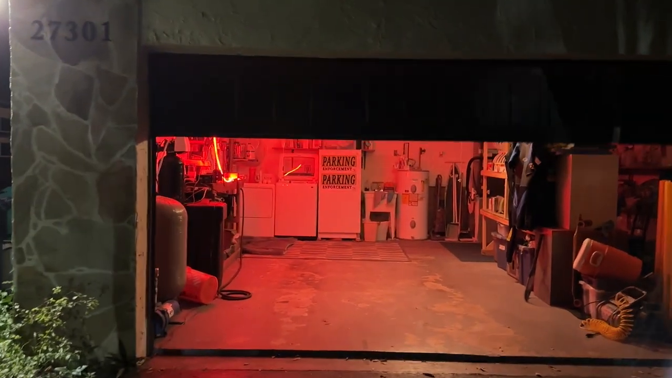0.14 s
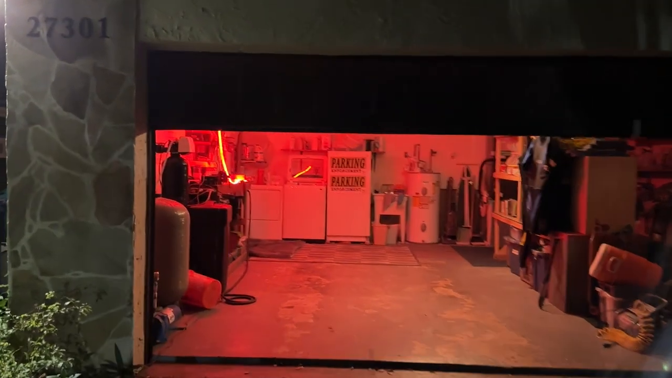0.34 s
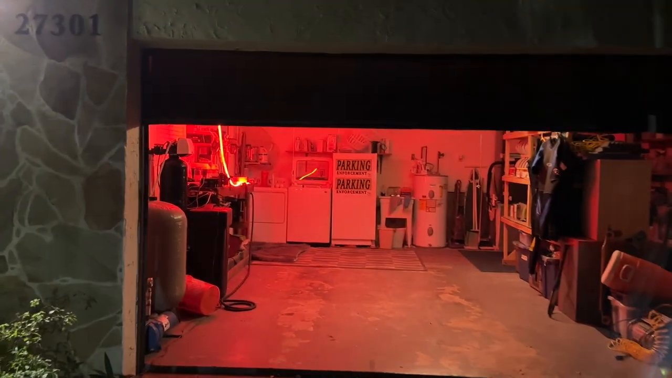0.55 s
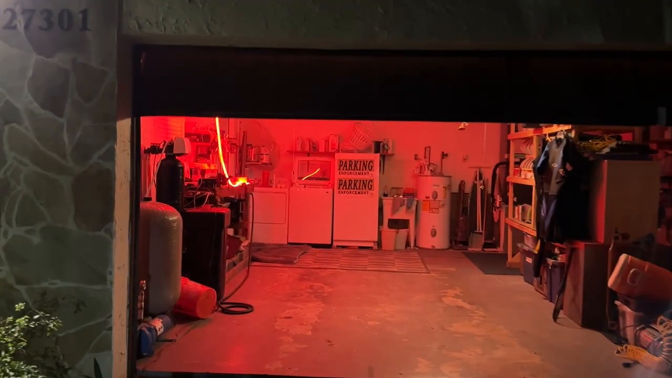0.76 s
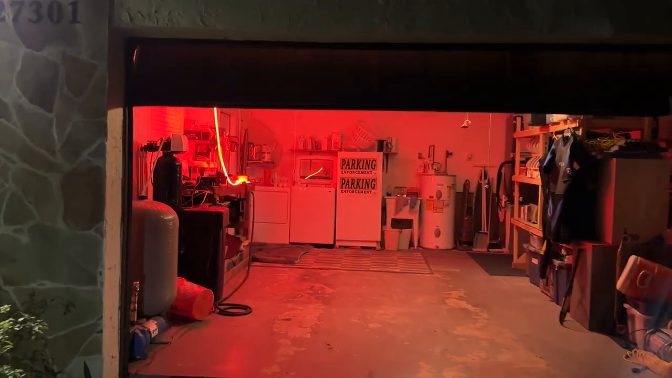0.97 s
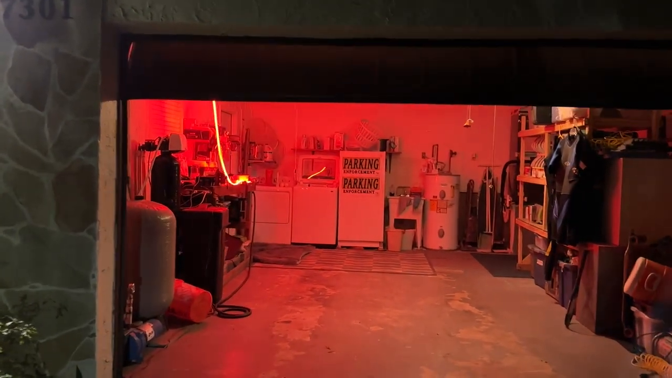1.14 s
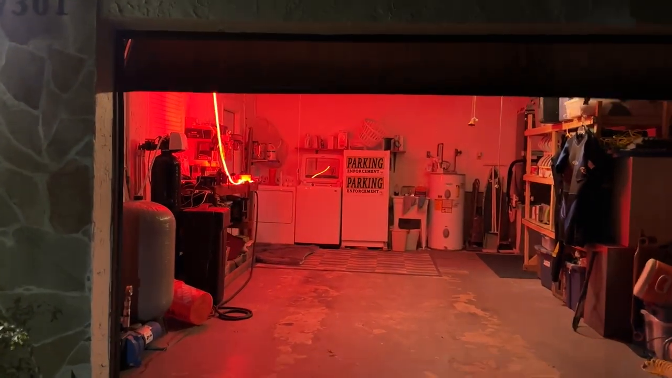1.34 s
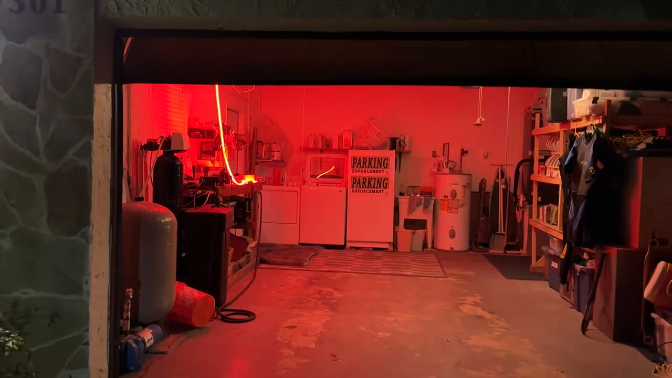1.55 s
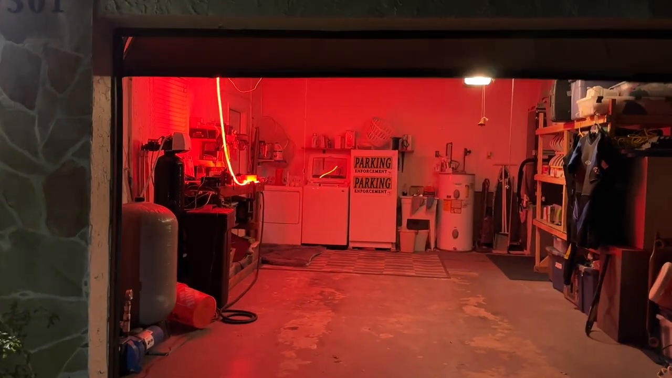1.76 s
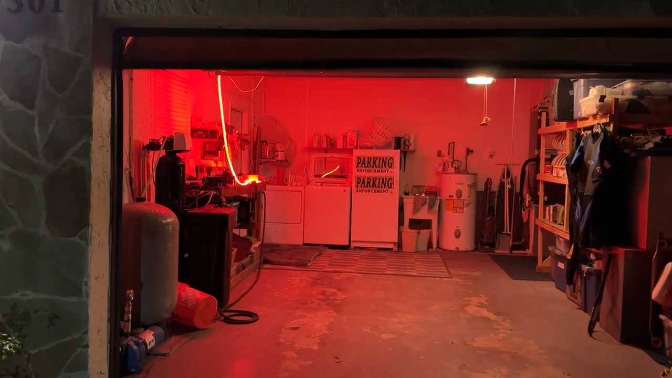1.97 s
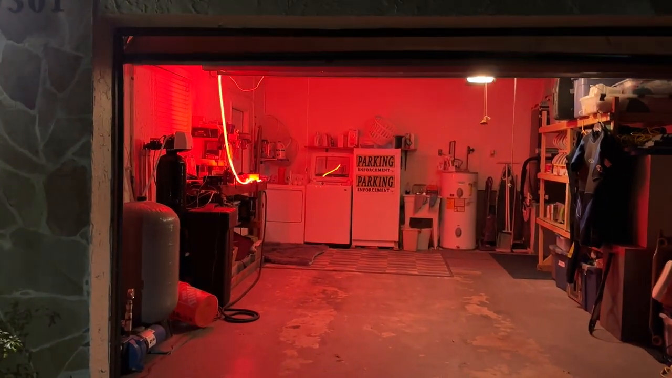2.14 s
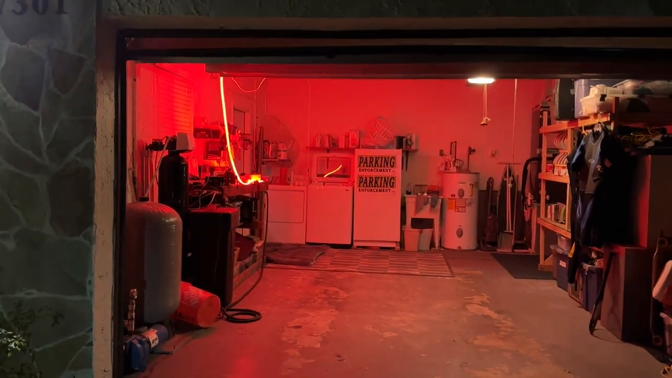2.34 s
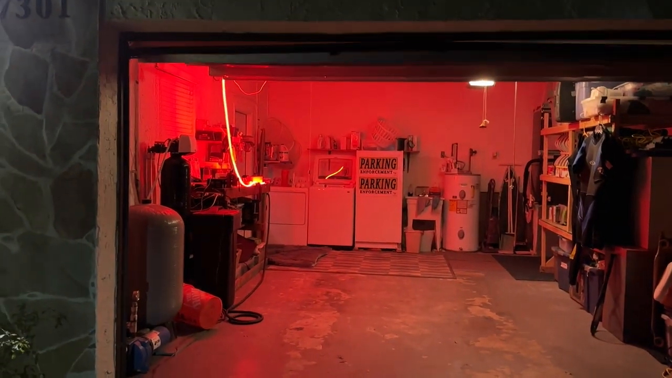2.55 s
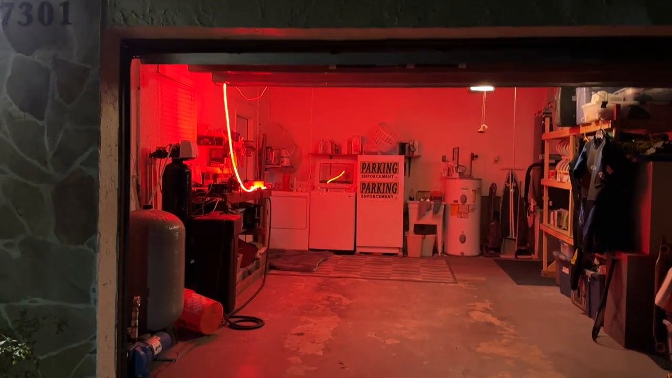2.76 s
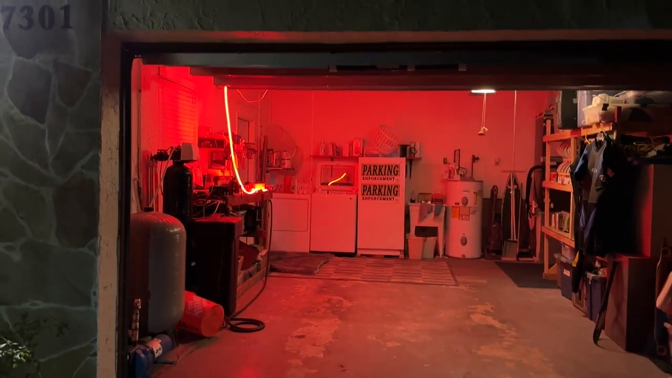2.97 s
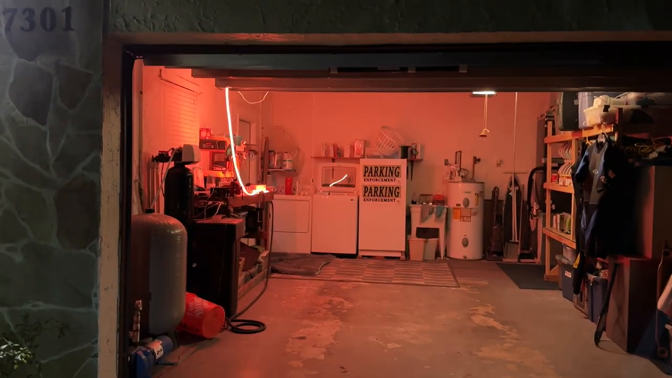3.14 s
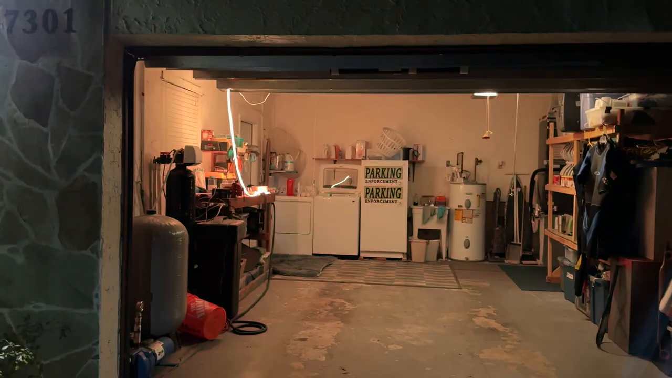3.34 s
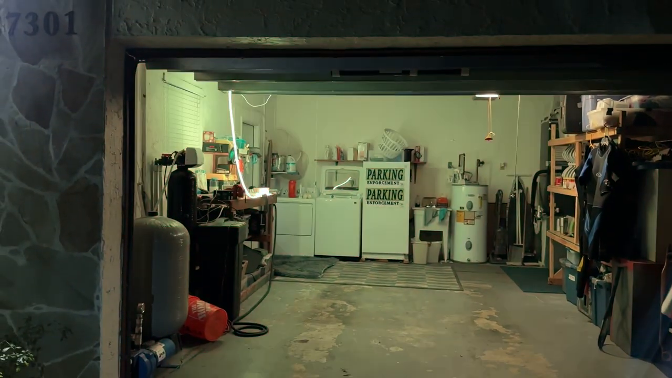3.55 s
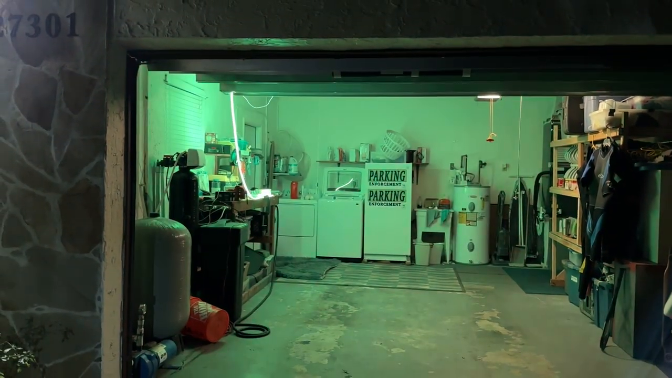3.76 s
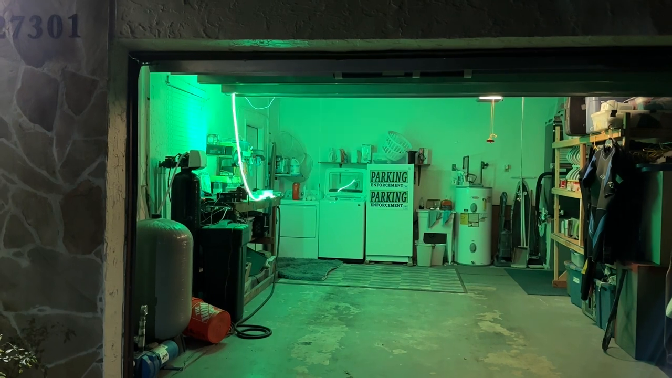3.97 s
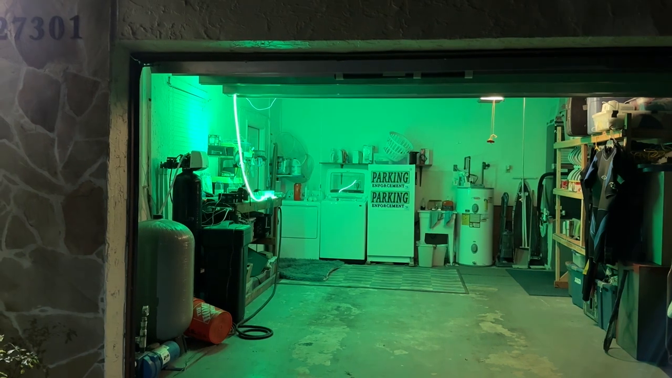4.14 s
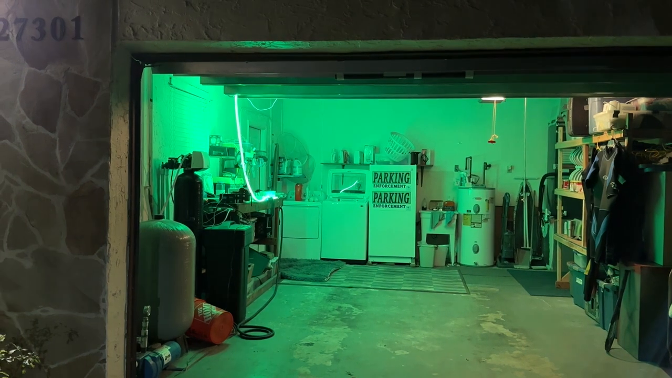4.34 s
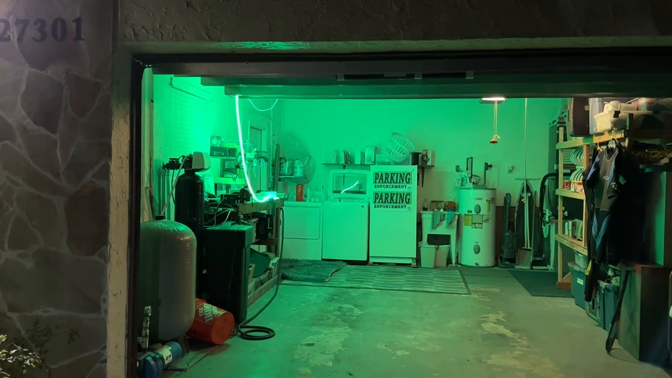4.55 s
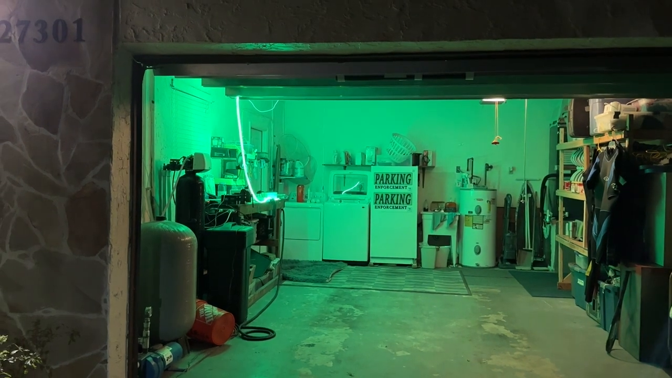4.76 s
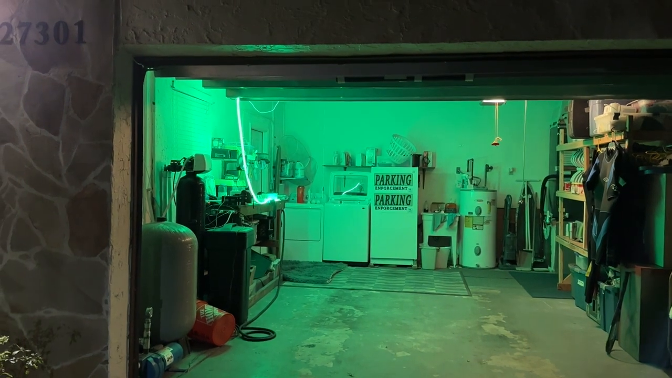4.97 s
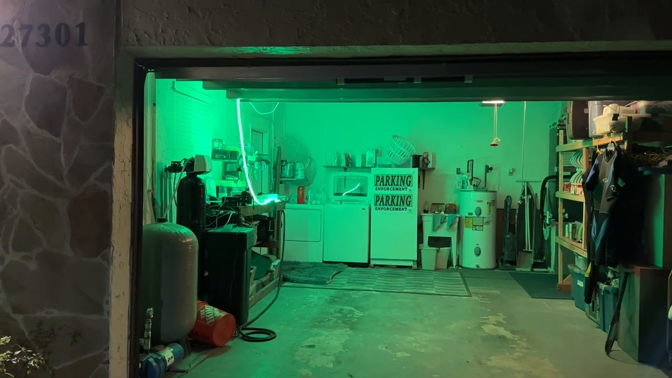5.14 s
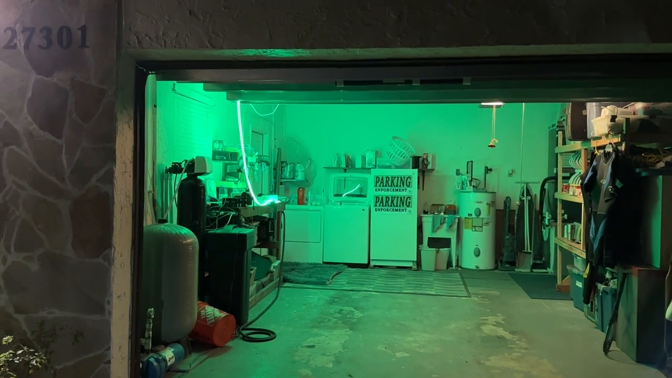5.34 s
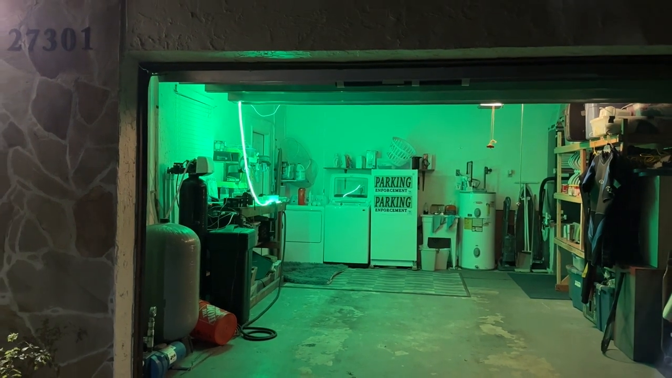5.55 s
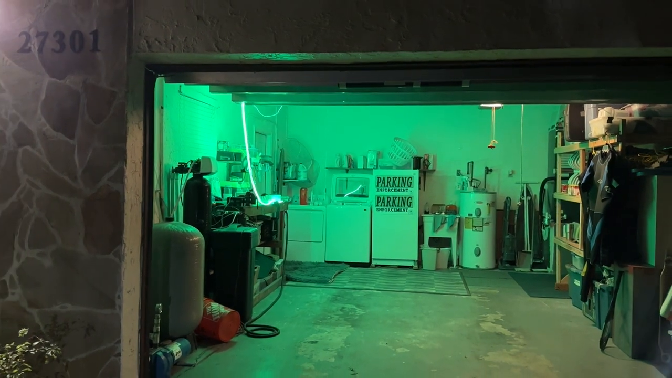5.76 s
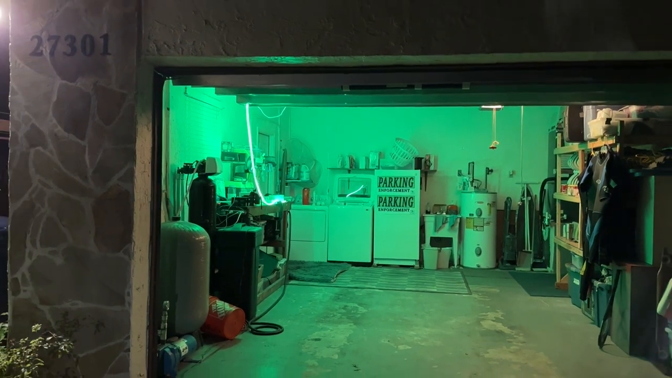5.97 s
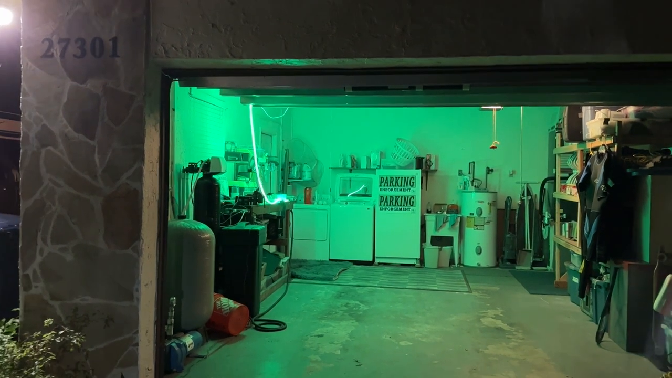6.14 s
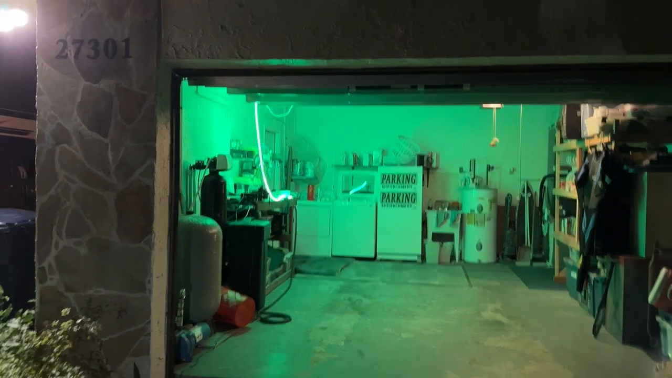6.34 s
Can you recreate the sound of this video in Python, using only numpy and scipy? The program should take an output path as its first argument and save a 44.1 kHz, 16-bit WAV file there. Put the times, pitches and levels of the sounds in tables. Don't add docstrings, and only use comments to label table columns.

```python
import sys
import numpy as np
from scipy import signal
from scipy.fft import rfft, irfft
from scipy.io import wavfile
from scipy.ndimage import uniform_filter1d

SR = 44100
rng = np.random.default_rng(int(sys.argv[2]) if len(sys.argv) > 2 else 0)


def invert_db(x):
    u = np.asarray(x, float) / 20
    return 10 ** u


def unload_audio(sound):
    columns = np.transpose(np.atleast_2d(sound))
    steps = np.round(np.clip(columns, -1, 1) * 32767)
    wavfile.write(sys.argv[1], SR, steps.astype(np.int16))


N = 282284
STOP_S = 3.181

SHAKE_RANGES_HZ = [250, 600, 1350, 3200]
# [start_s, peak_db, ring_hz, top_end_db, t60_s]
ROLLER_CLANKS = [(0.093, -35, 9400, -57, .25), (0.1184, -37, 9800, -62, 0.31),
                 (0.1577, -38, 8400, -57, 0.3), (0.343, -37.5, 10300, -51, 0.22),
                 (0.395, -36, 8800, -48, .12), (.408, -37, 7600, -46, .3), (0.423, -38, 9400, -47, 0.45),
                 (0.6611, -55, 6600, -56, .4), (0.736, -48, 8700, -56, .4), (1.0504, -42, 7000, -68, .4),
                 (1.3045, -25.5, 8600, -66, .13), (1.394, -46, 8800, -54, .2),
                 (1.4057, -36, 10700, -43, .3), (1.4299, -35, 10800, -56, .4),
                 (1.5411, -37.5, 7700, -53, 0.79), (1.65, -30.5, 8910, -42, 0.13),
                 (1.722, -46, 8150, -52, .2), (1.7425, -48, 8150, -52, .3), (1.808, -42, 7530, -57, .4),
                 (1.8417, -46, 7580, -60, .3), (1.9028, -39, 8280, -56, .3), (2.0294, -52, 9500, -54, .3),
                 (2.0673, -39, 6630, -54, 0.47), (2.2398, -44, 9000, -61, 0.37),
                 (2.3183, -39, 7290, -61, 0.41), (2.3476, -36, 8500, -61, 0.88),
                 (2.4337, -29.5, 6960, -46, .2), (2.499, -39, 8000, -56, 0.22),
                 (2.5586, -52, 9000, -60, 0.18), (2.6125, -34, 7800, -51, 0.22),
                 (2.6454, -41, 8440, -60, 0.27), (2.728, -42, 7820, -56, .2), (2.745, -39, 7820, -57, 0.45),
                 (2.868, -56, 8990, -59, .2), (2.884, -36, 7100, -52, 0.17),
                 (2.9574, -27.5, 7800, -39, .17), (3.002, -34, 8460, -46, 0.23),
                 (3.0592, -39, 9400, -64, .3), (3.0999, -40, 9600, -62, 0.18), (3.133, -34, 8250, -56, .25)]


def rms_one(x):
    return x / np.sqrt(np.mean(x ** 2) + 1e-20)


def in_time(rows):
    s, *columns = np.transpose(rows)
    return [np.interp(np.arange(N) / SR, s, c) for c in columns]


def at_hz(points, hz):
    return np.interp(np.log(hz), np.log(np.array(points)[:, 0]), np.array(points)[:, 1])


def drift(rate):
    r = np.exp(-80 * np.pi * rate / SR)
    slow = signal.lfilter([1], [1, -2 * r, r * r], rng.standard_normal(N // 40 + 2002))
    slow = slow[2000:]
    return np.interp(np.arange(N) / 40, np.arange(len(slow)), rms_one(slow))


def band(x, low_hz, high_hz, order=2):
    edges_hz = [low_hz, min(high_hz, .45 * SR)]
    return signal.sosfilt(signal.butter(order, edges_hz, "band", fs=SR, output="sos"), x)


def resonate(x, hz, width_hz):
    r = np.exp(-np.pi * width_hz / SR)
    poles = [1, -2 * r * np.cos(2 * np.pi * hz / SR), r * r]
    return signal.lfilter(np.array([1, 0, -1]) * (1 - r * r) / 2, poles, x)


def colour(x, spectrum):
    hz = np.maximum(np.fft.rfftfreq(N, 1 / SR), 1)
    return rms_one(irfft(rfft(x) * invert_db(at_hz(spectrum, hz)), N))


def tone(hz):
    return np.sqrt(2) * np.sin(2 * np.pi * np.cumsum(hz) / SR)


def grains(per_s, spread_db):
    sizes = invert_db(spread_db * np.minimum(rng.exponential(1, N), 5)) * rng.choice([-1, 1], N)
    return rms_one(sizes * (rng.random(N) < per_s / SR))


def add(out, s, x):
    i = round(s * SR)
    out[i:i + len(x)] += x[:N - i]


def decays(s, sizes, t60):
    steps = np.zeros(N)
    steps[(np.asarray(s) * SR).astype(int)] = sizes
    return signal.lfilter([1], [1, -invert_db(-60 / (t60 * SR))], steps + 1e-18)


def height():
    return np.clip(np.arange(N) / SR / STOP_S, 0, 1)


def after_stop(t60):
    return -60 * np.maximum(np.arange(N) / SR - STOP_S, 0) / t60


def burst(t60, rise_s):
    t = np.arange(SR // 4) / SR
    bounces = invert_db(2.0 * np.repeat(rng.standard_normal(len(t) // 300 + 1), 300)[:len(t)])
    bounces[:450] = invert_db(2.0)
    early = uniform_filter1d(bounces, size=80) * invert_db(-60 * t / t60)
    room = invert_db(-20.0 - 60 * t / 0.45)
    attack = 1 - np.exp(-t / rise_s)
    fade_out = np.minimum(1, 20 * (t[-1] - t))
    return rng.standard_normal(len(t)) * attack * (early + room) * fade_out


def many_modes(x):
    ripple_db, ripple_hz = 1.8, 40
    hz, spectrum = np.fft.rfftfreq(N, 1 / SR), rfft(x)
    ripples = ripple_db * rng.standard_normal((2, int(hz[-1] / ripple_hz) + 2))
    low, high = (irfft(spectrum * invert_db(np.interp(hz / ripple_hz, np.arange(len(r)), r)), N)
                 for r in ripples)
    blend = np.sin(2.5 * np.pi * height()) ** 2
    return blend * low + (1 - blend) * high


def night():
    # [pitch_hz, density_db_per_hz]
    wash_spectrum = [(18, -70), (38, -45), (60, -11), (90, 0), (192, 0), (277, -4.5), (467, -6.5),
                     (970, -5), (1590, -11.5), (2400, -25), (3500, -34), (4800, -36), (7650, -39.5),
                     (15500, -60)]
    # [start_s, level_db]
    wash_level = [(3.8, -55), (4.09, -56), (4.45, -57), (5.45, -59), (5.71, -58), (6.2, -59.5)]
    # [start_s, level_db]
    engine_level = [(3.8, -69), (4.23, -73.5), (4.36, -60.5), (4.95, -76), (5.08, -63.5), (5.36, -80),
                    (6.4, -74)]
    wash = colour(rng.standard_normal(N), wash_spectrum)
    wash = wash * invert_db(in_time(wash_level)[0] + 0.38 * drift(9.3))
    engine_db = in_time(engine_level)[0] + 2.0 + 2.0 * drift(13)
    return wash + invert_db(engine_db) * tone(197 + 4.1 * drift(5.92))


def singer(faster, unsteady, centre, wide, fade_db):
    # [start_s, strokes_per_s]
    wing_strokes = [(0, 165.75), (4.3, 165.7), (5.2, 165.45), (6.4, 165.3)]
    cycles = np.cumsum(faster * in_time(wing_strokes)[0] * (1 + unsteady * drift(2.5))) / SR
    out = 0
    for k in range(round(centre) - 3, round(centre) + 7):
        wing_db = -14 * np.log10(1 + ((k - centre) / wide) ** 4) + fade_db * drift(5.0)
        hushed_db = -40 * (k < 36 and faster == 1)
        out = out + invert_db(wing_db + hushed_db) * np.sin(2 * np.pi * (k * cycles + rng.random()))
    return rms_one(out)


def insects():
    # [start_s, level_db]
    chorus_level = [(0, -55.5), (.6, -53), (1.2, -54.5), (3.2, -52), (3.6, -61), (4.2, -61), (5, -61),
                    (5.7, -61), (6.4, -61.5)]
    # [pitch_hz, density_db_per_hz]
    far_spectrum = [(4000, -45), (5000, -27), (5250, -18), (5450, -14), (5700, -2), (5840, 2), (5910, -3),
                    (6050, -2), (6200, -5), (6400, -10), (6900, -16), (7050, -27), (7800, -32),
                    (10000, -60)]
    near = singer(1, .00016, 37.6, 2.1, fade_db=2.5) * invert_db(-6.0)
    other = singer(1.0057, .0009, 35.8, 1.8, fade_db=4) * invert_db(-11)
    throb = 1 + 0.15 * np.sin(2 * np.pi * 32.0 * np.arange(N) / SR + 2 * drift(2.4))
    far = colour(rng.standard_normal(N), far_spectrum) * throb * invert_db(1.3 * drift(17))
    whistle = resonate(resonate(rng.standard_normal(N), 2200, 25), 2200, 25)
    whistle = rms_one(whistle) * invert_db(-27 + 2.5 * drift(5))
    low_singer = rms_one(band(rng.standard_normal(N), 2900, 3600)) * invert_db(-25 + 2.0 * drift(9))
    return invert_db(in_time(chorus_level)[0]) * (near + other + invert_db(-3.5) * far + whistle + low_singer)


def chirps():
    # [centre_s, level_db]
    notes_sung = [
        (5.885, -66),
        (5.945, -62),
        (6.005, -59),
        (6.065, -59),
    ]
    pitch_hz, length_s = 5800, 0.04
    out, size = np.zeros(N), round(length_s * SR)
    for s, db in notes_sung:
        add(out, s - length_s / 2, invert_db(db) * np.hanning(size) * tone(np.full(size, pitch_hz)))
    return out


def ticks():
    # [start_s, peak_db, centre_hz, width_octaves, t60_s]
    knocks = [(0.155, -31.5, 5440, 0.83, 0.31), (1.405, -29.5, 4400, 0.51, 0.43),
              (1.642, -30, 550, 0.57, .15), (1.652, -28.5, 2580, 0.44, .1), (2.878, -27.5, 3970, 1.4, 0.15),
              (5.222, -70, 9380, 0.3, .15), (5.525, -74, 8000, 1, .06), (6.281, -47.5, 430, 1.5, 0.12),
              (6.277, -61, 2200, 1.8, 0.5), (6.279, -77, 8000, 1, .4), (1.33, -35, 480, .7, .1),
              (1.303, -33, 2500, .8, .05), (6.33, -65, 3000, 1.2, .12), (6.3, -49, 800, 1, 0.15),
              (6.324, -52, 1400, 0.71, 0.25), (6.375, -51, 800, 1, 0.11)]
    out = np.zeros(N)
    for s, db, hz, octaves, t60 in knocks:
        half_width = 2 ** (octaves / 2)
        tick = band(burst(t60, rise_s=0.0052), hz / half_width, hz * half_width, order=3)
        add(out, s, invert_db(db) * tick / np.abs(tick).max())
    return out


def motor():
    # [start_s, pitch_hz, level_db, octave_db]
    hum = [(0.0, 117, -35, -34.5), (0.01, 116.9, -42.5, -57), (0.23, 120.5, -41.5, -47.5),
           (.6, 120, -39.5, -49), (1.0, 119.6, -36.5, -51), (1.08, 121.2, -39, -42),
           (1.25, 121.6, -38, -49.5), (1.55, 120.3, -43.5, -49), (1.92, 120.3, -48.5, -47),
           (2.3, 119.8, -44.5, -42), (2.45, 119.8, -45, -47), (2.74, 119.5, -45, -51),
           (2.81, 111, -43.5, -50), (2.89, 110.2, -44, -49.5), (3.04, 111, -45.5, -52),
           (3.1, 109.4, -50, -54), (3.24, 118, -52, -50), (3.4, 112, -56, -52), (3.6, 114, -67, -60)]
    hz, level_db, octave_db = in_time(hum)
    power = np.clip((3.7 - np.arange(N) / SR) / 0.13, 0, 1)
    first = invert_db(level_db - .5 + 3.2 * drift(9.0)) * tone(hz)
    second = invert_db(octave_db - 1.5 + 3 * drift(14)) * tone(2 * hz + 1.47 * drift(9.0))
    return power * (first + second)


def squeaks():
    # [start_s, length_s, start_hz, end_hz, level_db]
    groans_and_squeaks = [(.0, 0.16, 1847, 1724, -45), (.05, 0.34, 858, 800, -44), (.27, 0.45, 1560, 1500, -40),
                          (0.701, 0.17, 1613, 1518, -41.5), (1.948, 0.16, 1578, 1622, -34),
                          (2.044, 0.65, 1414, 1445, -37.5), (2.298, 0.17, 1698, 1590, -33.5),
                          (2.329, 0.29, 628.5, 564.4, -36.5), (2.451, 0.24, 1047, 1007, -36),
                          (2.618, 0.27, 563, 509.5, -35.5), (2.718, 0.17, 1006, 1301, -37),
                          (2.795, 0.34, 278.5, 284, -35), (2.871, 0.071, 1073, 1300, -33),
                          (2.975, 0.07, 1070, 1340, -42), (2.979, 0.23, 600, 581, -35.5),
                          (1.039, 0.18, 382, 342, -47), (1.321, 0.061, 475, 439, -40),
                          (1.64, 0.062, 559.5, 525, -41), (2.1, 0.37, 846, 906, -43.5),
                          (.14, .12, 570, 531, -40.5), (1.05, 0.098, 530, 502, -41.5),
                          (1.952, 0.076, 1060, 1030, -35), (1.65, 0.082, 1500, 1463, -44),
                          (2.359, .12, 1190, 1203, -40), (3.0, .06, 1280, 1312, -35), (3.3, .15, 567, 600, -56),
                          (3.478, 0.22, 737, 760, -59), (3.524, 0.13, 1420, 1390, -61),
                          (3.44, .26, 620, 605, -60), (3.4, .25, 250, 290, -55), (3.7, .25, 255, 240, -62),
                          (3.34, .08, 990, 970, -52), (2.9, .06, 1040, 1060, -35), (2.97, .07, 1250, 1270, -35),
                          (2.8, .1, 560, 570, -36), (1.3, .09, 2150, 2100, -45), (1.68, .2, 1150, 1100, -46),
                          (1.32, .1, 2850, 2750, -48), (1.8, .15, 1700, 1650, -42), (.28, .03, 1600, 1580, -40),
                          (.16, .07, 800, 780, -43),
                          (.0, 0.24, 2590, 2520, -43), (0.255, .3, 2530, 2357, -44), (.0, .25, 2896, 2800, -45.5),
                    (.1, .6, 2075, 2022, -46), (0.756, 0.12, 2200, 2100, -44),
                    (0.873, 0.094, 3800, 3850, -45.5), (0.951, 0.21, 4100, 4000, -50.5),
                    (1.046, 0.045, 2600, 2300, -42), (1.051, .08, 4200, 3880, -46.5),
                    (1.301, 0.032, 2850, 2820, -46), (2.468, 0.06, 2600, 2600, -42),
                    (2.08, .03, 12600, 12500, -61), (1.114, 0.032, 2500, 2490, -47),
                    (1.446, 0.23, 10800, 11000, -68), (1.533, 0.14, 12400, 12600, -56),
                    (1.585, 0.23, 12700, 12500, -65), (1.681, .28, 8530, 8400, -57),
                    (1.653, .032, 2470, 2930, -42), (1.838, 0.16, 2880, 2706, -39.5),
                    (1.856, .115, 3780, 3800, -47.5), (1.905, .05, 9000, 9000, -51),
                    (1.973, .144, 2700, 2400, -41.5), (2.064, .04, 14000, 13000, -67),
                    (2.085, .05, 4360, 4700, -42.5), (2.204, 0.14, 2260, 2500, -40.5),
                    (2.425, 0.035, 14600, 14600, -61), (2.474, 0.047, 2300, 3600, -43)]
    out = np.zeros(N)
    for start, length, from_hz, to_hz, db in groans_and_squeaks:
        size = round(length * SR)
        rough_hz = 8 + 0.013 * from_hz / length ** 0.25
        r = np.exp(-4 * np.pi * rough_hz / SR)
        noise = rng.standard_normal((2, size + 3000))
        slip = [1, 1j] @ signal.lfilter([1], [1, -2 * r, r * r], noise)[:, -size:]
        phase = 2 * np.pi * np.cumsum(np.linspace(from_hz, to_hz, size)) / SR
        slide = rms_one(np.real(slip * np.exp(1j * phase)))
        add(out, start, invert_db(db) * signal.windows.tukey(size, .7) * slide)
    return out


def grit():
    # [start_s, level_db]
    grinding = [(0.0, -65), (0.36, -61), (0.59, -61), (1.36, -59.5), (1.51, -50), (1.73, -49.5),
                (2.01, -54.5), (3.02, -52), (3.12, -53)]
    stir_db, stir_t60_s = -23, 0.23
    s, db, _, top_db, _ = np.transpose(ROLLER_CLANKS)
    grind_db = in_time(grinding)[0] - 1.3
    crunch = many_modes(rng.standard_normal(N) + 0.59 * grains(1800, spread_db=0.5))
    low_size = invert_db(grind_db) + decays(s, invert_db(db + stir_db), stir_t60_s)
    low = low_size * rms_one(band(crunch, 4500, 10580, order=5))
    grind_top = invert_db(grind_db - 14 + 0.29 * (grind_db + 51))
    top_size = grind_top + decays(s, invert_db(top_db + stir_db + 3.5), 1.5 * stir_t60_s)
    high = top_size * rms_one(band(crunch[::-1], 10200, 16500))
    uneven = invert_db(1.5 * drift(20))
    return invert_db(after_stop(0.5)) * uneven * (low + high)


def clanks():
    out = np.zeros(N)
    chance = rng.random((len(ROLLER_CLANKS), 6))
    for (s, db, hz, top_db, t60), places in zip(ROLLER_CLANKS, chance):
        crack = burst(np.clip(t60, .06, .6), rise_s=.002)
        chance_rings = sum(resonate(crack, 6500 + 4000 * k, 270) for k in places[:3])
        rings = resonate(crack, hz, 430) + 0.21 * chance_rings
        mid = band(crack, 6000, 10800, order=3) + 2.5 * rings
        mid = band(mid, 3000, min(hz + 1700, 11300), order=4)
        other = crack * rng.choice([-1, 1], len(crack))
        thin = other * invert_db(-60 * np.arange(len(other)) / SR / 0.87)
        top_rings = sum(resonate(thin, 11000 + 4700 * k, 300) for k in places[3:])
        top = band(thin, 10000, 15300) + .9 * top_rings
        body_db = -39 + 0.55 * (db + 29)
        body = invert_db(min(body_db, -34) + 2) * band(other, 2800, 6500)
        add(out, s - .003, invert_db(db - 9.5) * mid + invert_db(top_db - 2.5) * top + body)
    return out


def shaking():
    # [start_s, strength_db, looseness_db_per_octave]
    door_shake = [(0.0, -35, 0.5), (0.3, -36, 0.5), (0.5, -37, 0.5), (0.85, -38, 1.2), (1.12, -36, 1.6),
                  (1.28, -42.5, 0.5), (1.64, -39.5, 1.7), (1.655, -33, 1), (1.93, -34, 1.3),
                  (1.97, -29.5, 0.1), (2.3, -29, 1), (2.5, -28, 2.5), (2.58, -34, 0.4), (2.75, -31.5, 1),
                  (2.86, -26.5, 0), (3.02, -26, 2), (3.2, -31, -0.2)]
    # [start_s, extra_db,
    # sharpness_db_per_octave]
    panel_jolts = [(0.0, 5, 0.5), (0.153, 3.5, 1.5), (.291, 0, 0), (.362, 3, .2), (0.409, 3.5, .5),
                   (.597, -0.5, -0.5), (.679, 1.5, -2), (.761, 2.5, -1.8), (1.048, 1.5, -0.3),
                   (1.148, 3, -1.5), (1.306, 4, 5), (1.527, 4, -2.5), (1.645, 1, -1), (1.951, 1, 1.5),
                   (2.1, 1.5, -0.5), (2.219, 0.5, -0.5), (2.324, 1, -0.5), (2.469, 2.5, -0.6), (2.612, 2, 0),
                   (2.645, 2.5, -1.5), (2.678, -1, -0.4), (2.722, 0.5, -.5), (2.874, 2.5, 1.5),
                   (2.998, 4, -1), (3.137, 3.5, 1), (3.345, 2, -1), (3.49, 1, -0.5)]
    swing_share = [0.14, 0.73, 1.085, 0.58]
    rise_with_height = [2.5, 5, -4, 0.5]
    garage_ring = [1.6, 1.09, 0.9, 0.63]
    late_db, late_longer = -11, 1.6
    strength, loose = in_time(door_shake)
    s, db, sharp = np.transpose(panel_jolts)
    jolt_t60 = 0.051 * np.log(1000)
    swing = strength - strength[:3 * SR].mean() + decays(s, db, jolt_t60)
    loose = loose + decays(s, sharp, jolt_t60)
    swing = uniform_filter1d(swing, size=120)
    loose = uniform_filter1d(loose, size=120)
    levels = []
    for hz, share, rise, t60 in zip(SHAKE_RANGES_HZ, swing_share, rise_with_height, garage_ring):
        moving = share * swing + loose * np.log2(hz / 1000) + rise * (height() - .5)
        ring_out = np.maximum(after_stop(t60), late_db + after_stop(late_longer * t60))
        levels.append(moving + ring_out)
    return levels


def panels():
    # [pitch_hz, density_db_per_hz]
    steel_spectrum = [(26, -66), (45, -25), (92, -15), (120, -7.5), (165, -11.5), (244, -7.5), (396, -6.5),
                      (579, -.5), (746, -8), (1000, -3.5), (1700, -6), (1930, -13.5), (2250, -11.5),
                      (2850, -14.5), (3100, -19.5), (4890, -21.5), (7000, -31.5), (9100, -32.5)]
    # [pitch_hz, width_hz, level_db]
    resonances = [(285.7, 11.4, 5.5), (600, 250, -2), (1030, 19, 1), (1340, 70, 0.5), (1560, 150, 2.5),
                  (1770, 61, 5), (2530, 520, 3), (3530, 920, 5.5)]
    drive = colour(rng.standard_normal(N) + 0.8 * grains(1500, spread_db=2.5), steel_spectrum)
    steel = drive + sum((invert_db(db) - 1) * resonate(drive, hz, width) for hz, width, db in resonances)
    steel = many_modes(steel)
    shake = np.array(shaking())
    shake -= 10 * np.log10(np.mean(invert_db(2 * shake[:, :3 * SR]), axis=1, keepdims=True))
    edges = 45 * 2 ** (np.arange(24) / 3)
    out, together = 0, drift(11)
    heard = 4 * SR
    for i, (low, high) in enumerate(zip(edges, edges[1:])):
        place = np.interp(np.log(low * high) / 2, np.log(SHAKE_RANGES_HZ), np.arange(4))
        swell_db = sum((1 - abs(place - k)) * shake[k] for k in range(4) if abs(place - k) < 1)
        swell_db = swell_db + 0.37 * together + 0.4 * drift(14) + 0.8 * drift(3.7)
        sign = (-1) ** i
        out = out + sign * invert_db(swell_db[:heard]) * band(steel[:heard], low, high)
    settle = np.clip((4.0 - np.arange(N) / SR) / 0.6, 0, 1)
    return invert_db(-34) * settle * np.pad(out, (0, N - heard)) / np.std(steel)


def scene():
    background = night() + insects() + chirps()
    door = ticks() + motor() + squeaks() + grit() + clanks() + panels()
    return (background + door)[None]


def roll_off(x):
    return signal.sosfilt(signal.butter(12, 15840, fs=SR, output="sos"), x)


def record(dry):
    heard = band(dry, 50, 19000, order=3)
    heard = signal.sosfilt(signal.cheby2(24, 60, 15950, fs=SR, output="sos"), heard)
    return roll_off(heard)


dry = scene()
out = record(dry)
unload_audio(out)
```